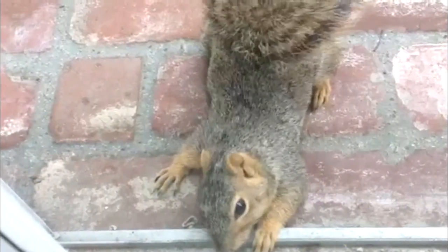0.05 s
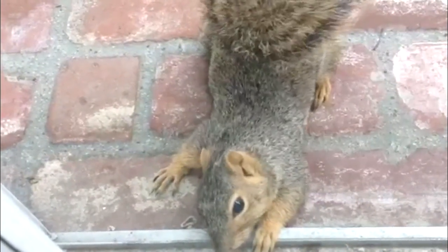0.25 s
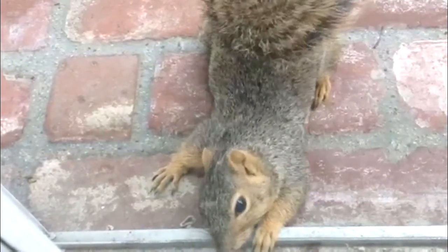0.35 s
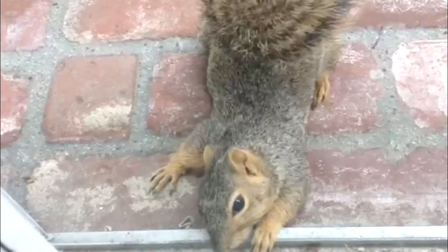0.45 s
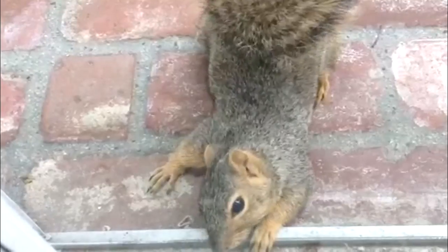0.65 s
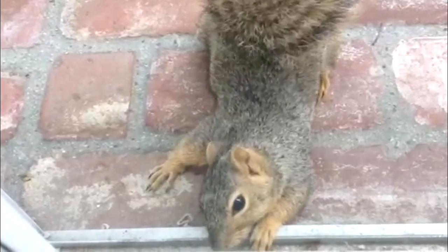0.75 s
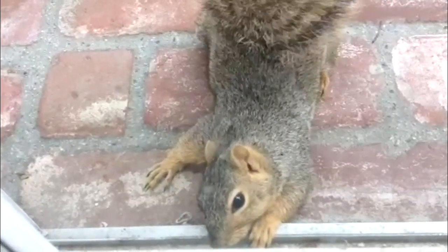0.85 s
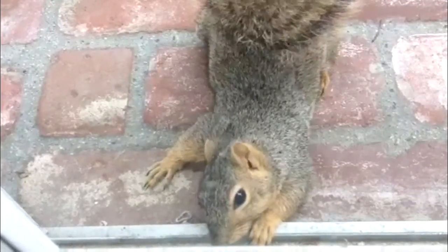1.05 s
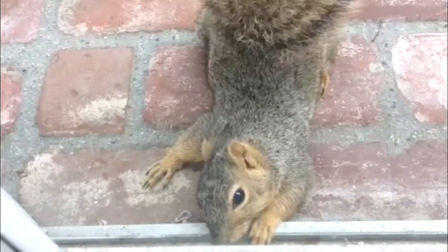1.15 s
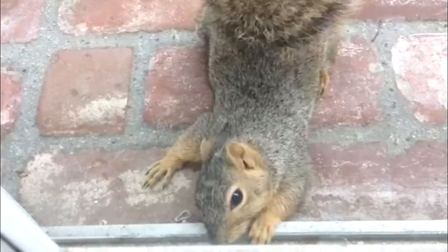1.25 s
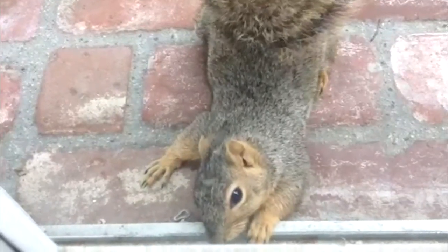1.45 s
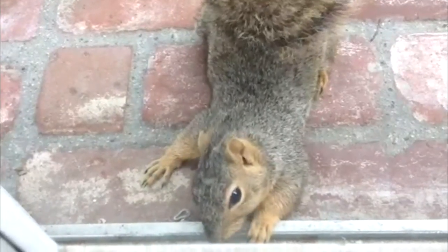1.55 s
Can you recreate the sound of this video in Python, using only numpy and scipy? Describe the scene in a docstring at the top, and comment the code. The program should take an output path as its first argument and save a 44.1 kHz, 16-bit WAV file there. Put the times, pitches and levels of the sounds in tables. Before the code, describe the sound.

A squirrel gnaws a metal patio door rail, about eight bites a second. Light ticks and briefly ringing knocks start unevenly, then grow louder and steadier, with tiny scrapes, over a faint hiss and low drone.

```python
"""At a patio door, a squirrel gnaws the metal rail, about eight bites a second.
In each bite the teeth catch on the edge with a light tick, then slip off and knock the rail,
which rings briefly while the frame shivers. Small scrapes sound where the teeth drag.
The walls give a faint tail over a steady hiss and a low drone."""
import sys
import numpy as np
from scipy import signal
from scipy.fft import rfft, irfft
from scipy.io import wavfile

SR = 44100
rng = np.random.default_rng(int(sys.argv[2]) if len(sys.argv) > 2 else 0)


def pcm_store(signal):
    """Save signal as 16-bit PCM."""
    levels = np.round(np.clip(np.atleast_2d(signal), -1, 1) * 32767)
    wavfile.write(sys.argv[1], SR, levels.astype(np.int16).T)


N = 70560
T, HZ = np.arange(N) / SR, np.fft.rfftfreq(N, 1 / SR)
STRIKE_T = T[:SR // 2]


def amp(db):
    """Decibels to gain."""
    return 10 ** (np.asarray(db) / 20)


def lookup(points, hz):
    """Interpolates a table over log frequency."""
    table_hz, value = np.transpose(points)
    return np.interp(np.log(hz + 1), np.log(table_hz + 1), value)


def add(mix, start_s, sound):
    """Mixes a sound in at start_s."""
    part = mix[round(start_s * SR):][:len(sound)]
    part += sound[:len(part)]


def coloured(x, gain_db):
    """Shapes the spectrum, then scales to unit rms."""
    shaped = irfft(rfft(x) * amp(gain_db), len(x))
    return shaped / np.sqrt(np.mean(shaped ** 2) + 1e-20)


# centre_hz, level_db, width_hz
DRONE_BANDS = [(122.3, -79.5, 12), (165.8, -68, 26.4), (203, -71, 7.3), (313, -67.5, 39)]
# freq_hz, density_db
HISS_SPECTRUM = [(25, -47), (55, -57), (80, -16), (110, -6), (180, -6.5), (250, -13), (320, -6), (480, 2.5),
                 (650, -4), (850, -6.5), (1300, -9.5), (2000, -14.5), (3000, -17.5), (5000, -17.5),
                 (9000, -21.5), (13000, -25.5), (15500, -30.5)]

def background():
    """Narrow noise bands waver as a low drone under steady hiss."""
    drone = np.zeros(N)
    for centre_hz, level_db, width_hz in DRONE_BANDS:
        band_db = -20 * np.log10(1 + ((HZ - centre_hz) / width_hz) ** 2)
        drone += amp(level_db) * coloured(rng.standard_normal(N), band_db)
    return drone + amp(-60) * coloured(rng.standard_normal(N), lookup(HISS_SPECTRUM, HZ))


# pitch_hz, knock_db, catch_db, t60_s
RAIL_MODES = [(387.6, -49, -60.5, 0.1), (447, -49, -65, 0.2), (498.7, -40, -57, 0.21),
              (707.7, -41, -65, 0.085), (785, -45, -67, 0.04), (863, -51, -51, 0.12),
              (1021.4, -44, -57.5, 0.12), (1098, -47.5, -58, 0.12), (1162, -45, -83, 0.093),
              (1245, -39.5, -40, 0.064), (1337.6, -48.5, -36, 0.054), (1435, -43, -42, 0.044),
              (1490, -53, -50, 0.12), (1710, -37, -39.5, 0.018), (1856, -51.5, -36, 0.022),
              (2268, -53.5, -47.5, 0.032), (2880, -70, -69.5, 0.018), (5270, -42.5, -56, 0.023)]

def rail_ring(kind, tilt_db_per_oct, ping_hz, ping_db):
    """Struck rail modes; their levels, most of all near ping_hz, depend on where the teeth land."""
    pitch_hz, knock_db, catch_db, t60_s = np.array(RAIL_MODES).T
    spread_db, detune = (rng.standard_normal((len(pitch_hz), 2)) * [2, 0.005]).T
    level_db = {"knock": knock_db, "catch": catch_db}[kind] + spread_db
    level_db += ping_db * np.exp(-((pitch_hz / ping_hz - 1) / 0.045) ** 2)
    level_db += tilt_db_per_oct * np.log2(pitch_hz / 1000)
    polarity = (-1) ** np.arange(len(pitch_hz))
    fades = amp(-60 * STRIKE_T / t60_s[:, None])
    tones = np.sin(2 * np.pi * np.outer(pitch_hz * (1 + detune), STRIKE_T))
    return (polarity * amp(level_db)) @ (fades * tones)


def mode_crowd(texture, spectrum, tilt_db_per_oct, t60_s):
    """Dense modes as decaying noise: part shared texture, part new at each contact."""
    drive = texture + 0.88 * rng.standard_normal(len(texture))
    drive[round(0.0004 * SR)] += amp(18.5)  # click of the tooth's first touch
    hz = np.fft.rfftfreq(len(drive), 1 / SR)
    fade = amp(-60 * STRIKE_T / t60_s)
    burst = fade * coloured(drive, lookup(spectrum, hz) + tilt_db_per_oct * np.log2(hz + 100))
    return burst * np.linalg.norm(fade) / np.linalg.norm(burst)


# freq_hz, density_db
FRAME_SHIVER_SPECTRUM = [(100, -11), (300, -20.5), (450, 3), (600, 0.5), (900, 6.5), (1400, 4.5),
                         (2200, -4.5), (3400, -4), (4500, -13), (5500, -11), (6500, -19.5), (9000, -26.5),
                         (15500, -51)]

def strike(ring, textures, crack_spectrum, tilt_db_per_oct, crack_db, shiver_db, contact_s=0.00038):
    """One contact: the rail's ring plus the crack of enamel on metal and the frame's shiver."""
    crack = mode_crowd(textures[0], crack_spectrum, tilt_db_per_oct, t60_s=0.015)
    shiver = mode_crowd(textures[1], FRAME_SHIVER_SPECTRUM, tilt_db_per_oct, t60_s=0.089)
    attack = np.minimum(STRIKE_T / contact_s, 1)
    return attack * (ring + amp(crack_db) * crack + amp(shiver_db) * shiver)


# start_s, level_db, tilt_db_per_oct, crack_db, ping_db
TOOTH_CATCHES = [(.0100, -24, 5, 7, -4), (0.1183, -11.5, 0, 5.5, 9.5), (.1605, -27, 2, 9, -4),
                 (0.2773, -23, 0, 8, 0), (0.361, -19.5, -4, 0, 0), (0.413, -15.5, 2.5, 11.5, 4),
                 (0.4193, -4.5, -5.5, -1, -3), (0.5142, -21.5, -1.5, 11, 0), (0.5648, -2.5, 3, -4, 1),
                 (.5728, -5, -13.5, 8, 1), (0.6956, -1, -1.5, -1.5, -2), (0.7028, -8.5, -8, 3, -3),
                 (.8037, -3, -4.5, -7, -15), (.9136, -7, 2, -2, 4), (0.9245, 0.5, -10.5, -2, -16),
                 (1.0287, -0.5, -1.5, -4, 6), (1.043, -5.5, -6.5, -7, -9), (1.1641, 7, -6.5, -12, -9),
                 (1.1770, -1.5, 4, -1, 2), (1.4090, -13.5, 0, 12, -6)]
# freq_hz, density_db
CATCH_CRACK_SPECTRUM = [(100, -76), (800, 9.5), (1400, 4.5), (2000, -6.5), (3000, 4), (5500, -1.5),
                        (6500, -21), (9000, -17), (15500, -35)]

def catches(textures):
    """Teeth catch on the edge with a light tick."""
    out = np.zeros(N)
    for start_s, level_db, tilt, crack_db, ping_db in TOOTH_CATCHES:
        ring = rail_ring("catch", tilt, ping_hz=1820, ping_db=ping_db)
        tick = strike(ring, textures, CATCH_CRACK_SPECTRUM, tilt, crack_db - 42.5, shiver_db=-46.5)
        add(out, start_s, amp(level_db) * tick)
    return out


# freq_hz, gain_db
WALL_SPECTRUM = [(150, 2), (300, 0.5), (500, -20), (1000, -6.5), (1500, -8.5), (3000, -11.5), (5500, -14),
                 (14000, -17)]
# freq_hz, t60_s
WALL_DECAY = [(300, 0.51), (1500, 0.48), (5000, 0.42), (14000, 0.28)]

def wall_tail(sound, build_s=0.016):
    """Diffuse reflections in overlapping bands, each with its own decay."""
    centres_hz = np.geomspace(150, 14000, 8)
    spectrum = rfft(rng.standard_normal(N)) * amp(lookup(WALL_SPECTRUM, HZ))
    response = np.zeros(N)
    for centre_hz, weights in zip(centres_hz, np.eye(len(centres_hz))):
        band = irfft(spectrum * lookup(np.c_[centres_hz, weights], HZ), N)
        fade = amp(-60 * T / lookup(WALL_DECAY, centre_hz)) * (1 - np.exp(-T / build_s))
        response += band * fade / np.linalg.norm(fade)
    return signal.fftconvolve(sound, response)[:N]


# start_s, length_s, level_db
TOOTH_SCRAPES = [(.202, .012, -48), (.442, .012, -48), (1.172, .022, -45), (1.18, .115, -59),
                 (1.285, .011, -55)]
# freq_hz, density_db
SCRAPE_SPECTRUM = [(100, -45), (700, -8), (1400, 9.5), (2000, 3), (3200, 1), (4500, -23), (9000, -31),
                   (15500, -45)]

def scrapes(slips_per_s=1900, spread_db=1):
    """Teeth drag along the metal in short swells of tiny slips."""
    out = np.zeros(N)
    for start_s, length_s, level_db in TOOTH_SCRAPES:
        slips = (rng.random(N) < slips_per_s / SR) * rng.standard_normal(N)
        slips *= amp(spread_db * rng.standard_normal(N))
        swell = np.sin(np.pi * np.minimum(T / length_s, 1))
        add(out, start_s, amp(level_db) * swell * coloured(slips, lookup(SCRAPE_SPECTRUM, HZ)))
    return out


# start_s, level_db, tilt_db_per_oct, crack_db, ping_db
TOOTH_KNOCKS = [(.2090, -5, -1, 3.5, 9), (.4472, -10.5, -3, 1.5, 4), (0.5813, -2, -0.5, -0.5, -1),
                (.7190, -3.5, -1.5, -5, 2), (.8183, -3, -1.5, -4, -16), (0.9318, -3.5, -3, -1, 5),
                (1.0613, 1.5, -.5, -4, 0), (1.1724, 2.5, 1, -4, 5), (1.3045, 1, -2, 1, 1.5)]
# freq_hz, density_db
KNOCK_CRACK_SPECTRUM = [(100, -21), (280, -4.5), (450, -10), (600, -8), (1400, 9.5), (2200, -8),
                        (3800, -1.5), (5500, -6), (6500, -11), (8800, -11.5), (10500, -21.5),
                        (13000, -24.5), (15500, -27)]

def knocks(textures):
    """Teeth slip off the edge and hit the rail."""
    out = np.zeros(N)
    for start_s, level_db, tilt, crack_db, ping_db in TOOTH_KNOCKS:
        ring = rail_ring("knock", tilt, ping_hz=1035, ping_db=ping_db)
        knock = strike(ring, textures, KNOCK_CRACK_SPECTRUM, tilt, crack_db - 30.5, shiver_db=-40.5)
        add(out, start_s, amp(level_db) * knock)
    return out


def scene():
    """Gnawing, wall tail and background, in mono."""
    textures = rng.standard_normal((2, len(STRIKE_T)))  # crack, shiver
    bass_cut = signal.butter(2, 292, "highpass", fs=SR, output="sos")  # narrow rail radiates little bass
    gnawing = signal.sosfilt(bass_cut, knocks(textures) + catches(textures) + scrapes())
    return (gnawing + wall_tail(gnawing) + background())[None]


def record(dry):
    """Steep lowpass band limit."""
    cutoff_hz = 15850
    lowpass = signal.firwin(511, cutoff_hz, window=("kaiser", 9), fs=SR)
    return signal.oaconvolve(dry, lowpass[None], "same")


dry = scene()
out = record(dry)
pcm_store(out)
```